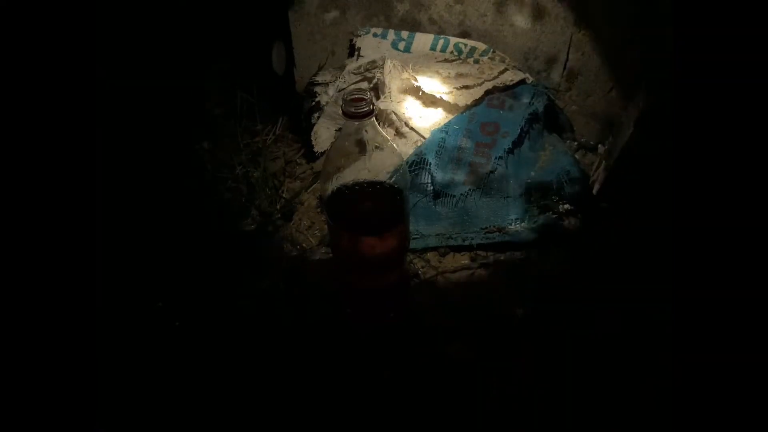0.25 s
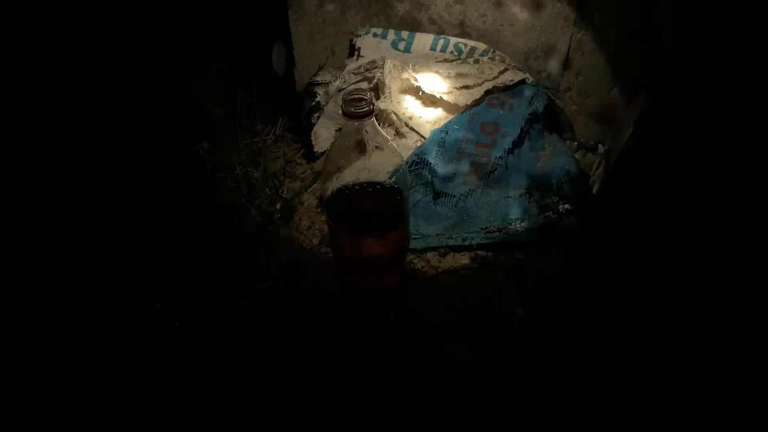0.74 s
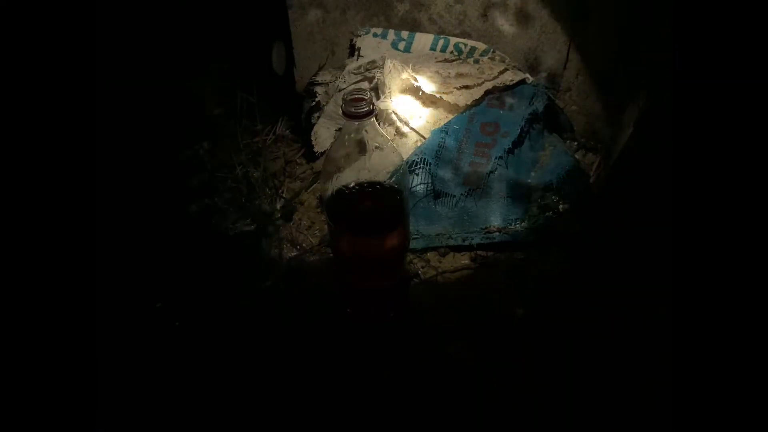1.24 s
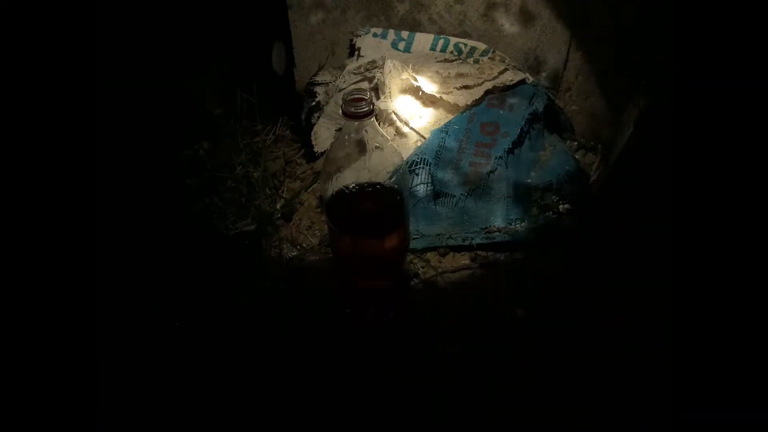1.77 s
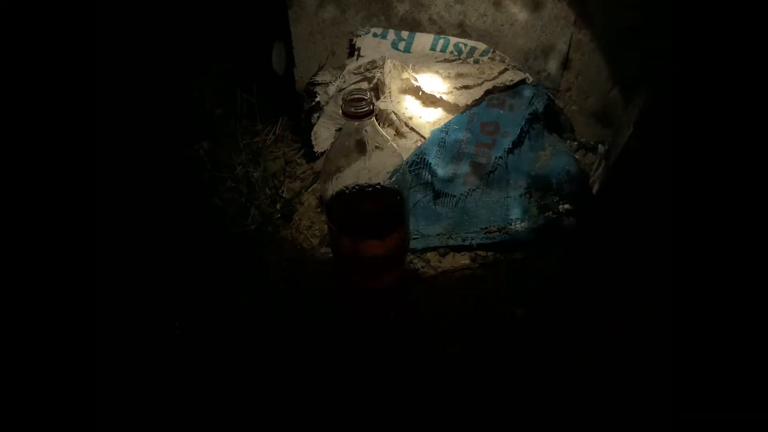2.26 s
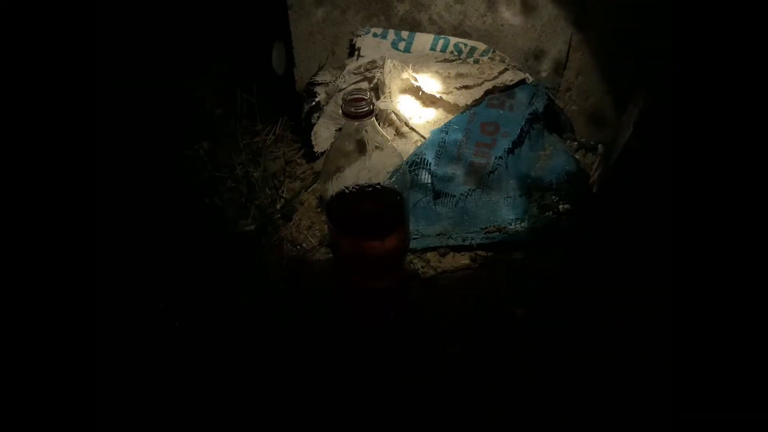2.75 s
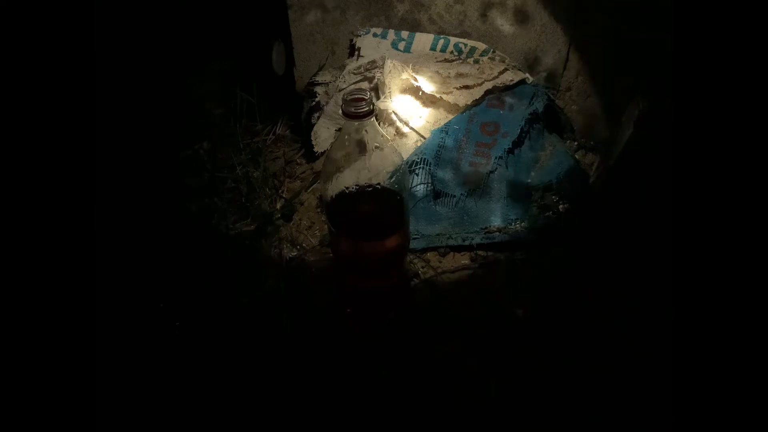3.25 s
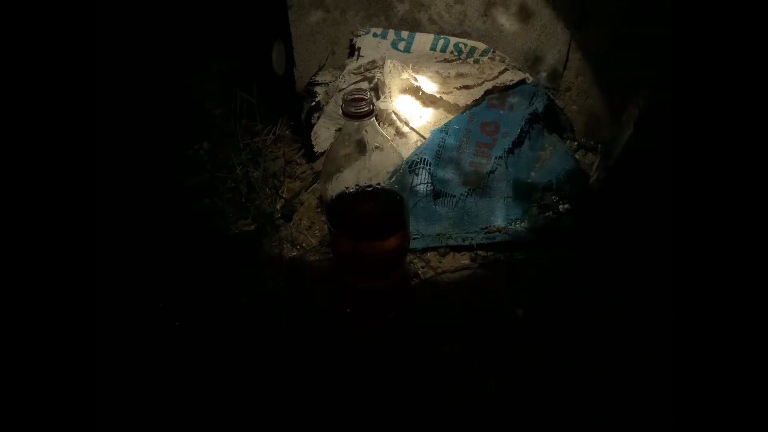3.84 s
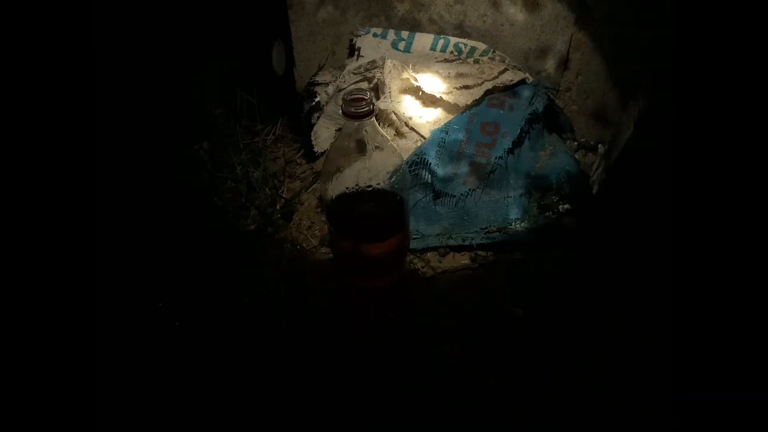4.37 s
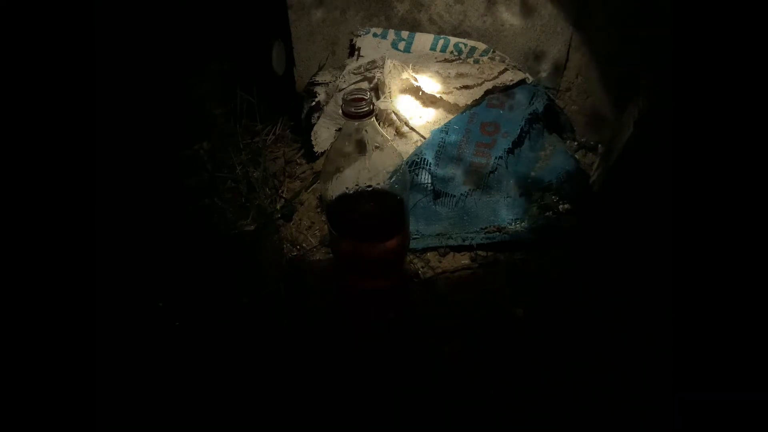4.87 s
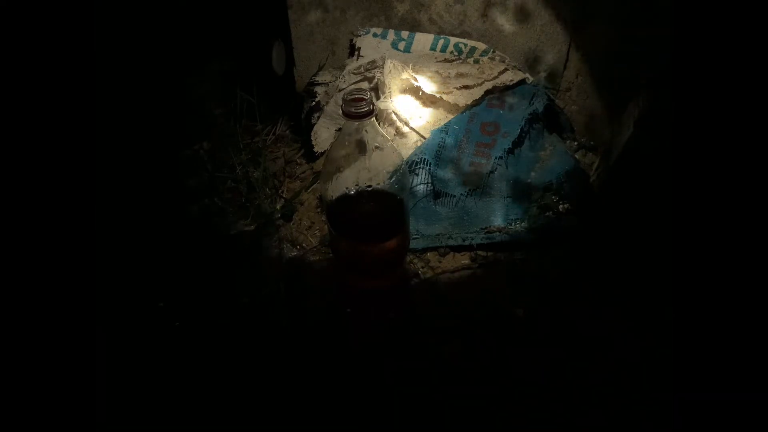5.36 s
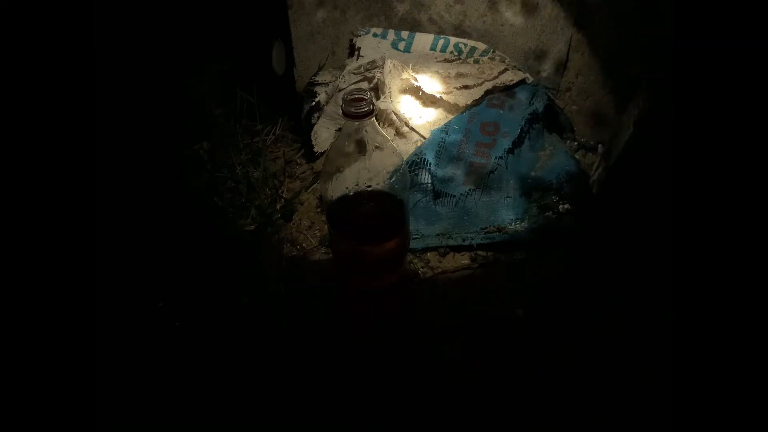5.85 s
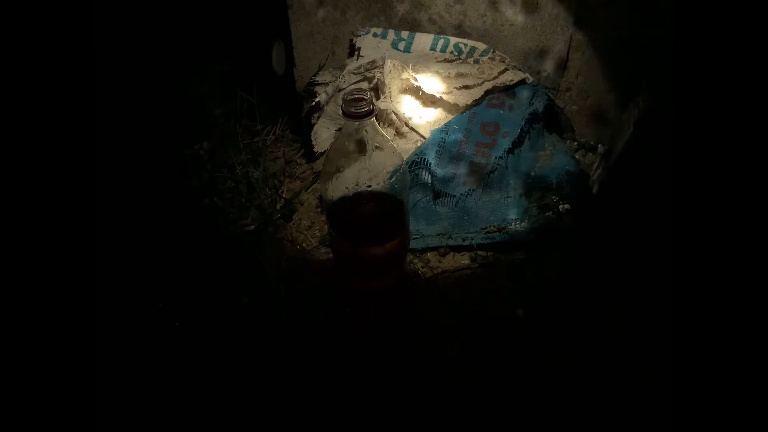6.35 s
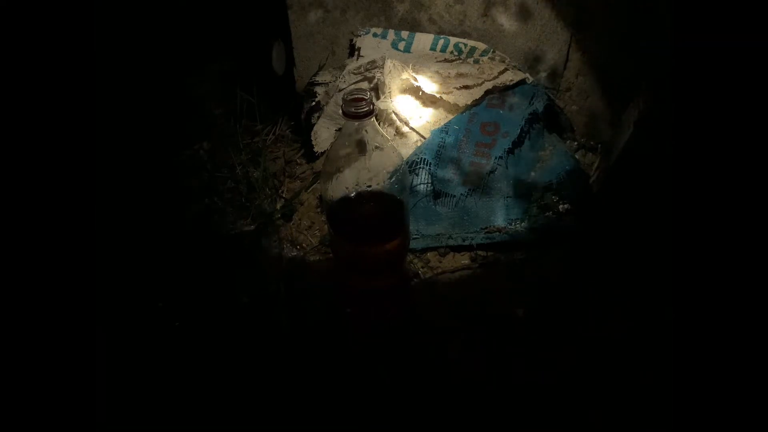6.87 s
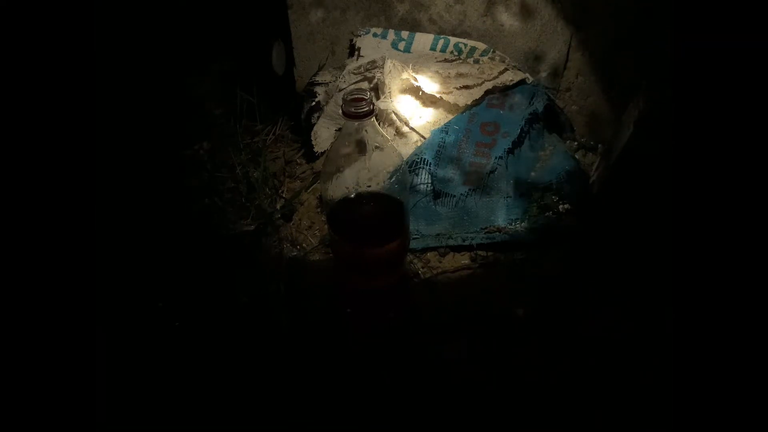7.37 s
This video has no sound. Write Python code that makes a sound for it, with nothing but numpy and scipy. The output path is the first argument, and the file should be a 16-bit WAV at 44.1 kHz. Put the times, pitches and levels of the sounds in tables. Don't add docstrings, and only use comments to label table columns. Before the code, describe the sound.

Close, rapid liquid patter on plastic sheeting outdoors, bright crackly ticks gaining deeper, looser thumps, with very quiet insects and a far engine behind.

```python
import sys
import numpy as np
from scipy import signal
from scipy.io import wavfile
from scipy.ndimage import uniform_filter1d

SR = 44100
rng = np.random.default_rng(int(sys.argv[2]) if len(sys.argv) > 2 else 0)


def to_wav(s):
    ch = np.atleast_2d(s).T
    pcm = np.round(np.clip(ch, -1, 1) * 32767)
    wavfile.write(sys.argv[1], SR, pcm.astype(np.int16))


def volts_from_decibels(level):
    exponent = np.asarray(level, float) / 20
    return 10 ** exponent


N = 335581

# (time [s], deep rumble level [dB], drone level [dB])
ROAD = [
    (0, -57, -61),
    (2.8, -56.5, -63.5),
    (3.2, -57.5, -62.5),
    (4.3, -62, -59.5),
    (5.2, -55.5, -63.5),
    (6.4, -61.5, -63),
    (6.6, -48.5, -59.5),
    (6.85, -59.5, -62.5),
    (7.6, -62, -64.5),
]
# (frequency [Hz], density [dB per Hz])
RUMBLE = [(8.8, -44), (15, -22), (43, 1.5), (59, 7.5), (145, -13), (183, -13), (355, -22), (454, -32.5),
          (600, -24), (780, -74), (1320, -120)]
# (time [s], cycle rate [Hz])
ENGINE = [
    (2.8, 17.2),
    (3.02, 19.2),
    (3.25, 20.8),
    (3.35, 23.6),
    (3.55, 23),
    (3.82, 23.2),
    (4.53, 23.2),
    (4.75, 23.2),
    (5.04, 22.1),
    (5.3, 23),
]
# (multiple of cycle rate [1], level [dB], time [s], half length [s])
ORDERS = [(4, -61, 3.88, 0.41), (5, -64.5, 3.9, 0.5), (6, -61, 3.42, 0.28), (6, -59, 4.48, 0.25),
          (6, -64.5, 5.0, 0.19), (7, -60.5, 3.41, 0.23), (7, -72, 4.0, 0.18), (7, -63.5, 4.78, 0.16),
          (8, -68.5, 3.1, 0.27), (9, -71, 4.33, 0.26), (9, -70, 4.9, .2), (10, -74, 3.1, .3)]
# (frequency [Hz], bandwidth [Hz], level [dB])
INSECTS = [(2416, 91, -71.5), (2700, 73, -76.5), (4624, 390, -69.5), (6640, 500, -72), (8320, 200, -76)]
# (time [s], half length [s], frequency [Hz], level [dB])
CHIRP = (5.789, .013, 4760, -48.5)
# (time [s], half length [s], level [dB], low edge [Hz], high edge [Hz])
SCUFF = (1.046, .012, -49, 600, 5000)
# (frequency [Hz], density [dB per Hz])
SPATTER = [(240, -37), (400, -3), (1080, -5), (2220, -2), (2400, 1.5), (3880, -4.5), (4610, -1.5),
           (6690, 2.5), (14800, -2), (15700, -3), (16500, -22)]
# (frequency [Hz], level [dB])
FACETS = [(5200, -32), (6800, 10.5), (8200, -4), (9800, -13), (11400, 14), (12900, 16), (14500, 4)]
# (frequency [Hz], level [dB], 60 dB decay time [s])
SHEET_MODES = [(624, -0.5, 0.021), (1250, -9.5, 0.022), (1848, -9, 0.027), (2470, -56, 0.06),
               (3060, 2.5, 0.0041)]
# (time [s], force on film [dB], force on sheet [dB], pitch of the spot hit [Hz])
FLOW = [(0, -34, -53, 2280), (1.2, -37.5, -66, 2290), (1.78, -35.5, -48.5, 2080), (1.86, -36, -42, 2210),
        (2.9, -30, -38, 1850), (3.5, -31, -47, 2000), (3.69, -30.5, -40, 3100), (3.9, -28, -55, 2140),
        (4.45, -31, -88, 2076), (4.62, -34, -61, 1284), (5.15, -33, -50, 1310), (5.5, -31, -55, 1300),
        (5.9, -28, -36, 1250), (6.45, -30, -41, 1203), (6.78, -40.5, -50, 1138), (6.9, -31, -44, 1330),
        (7.3, -35, -48, 1320), (7.6, -39, -40, 1250)]
# (time [s], peak level [dB], centre
# [Hz])
DISTINCT_TICKS = [(0.0544, -30, 11000), (0.0654, -25, 13350), (0.1585, -29.5, 10780), (0.212, -31.2, 14000),
                  (0.3835, -32.5, 10360), (0.3934, -33, 5940), (0.4049, -31.5, 10810), (0.4218, -35, 9530),
                  (0.458, -29.8, 11810), (0.5064, -30, 12640), (0.5575, -37, 10080), (0.5986, -36, 12800),
                  (0.6448, -39, 9750), (0.7239, -24.5, 11900), (0.8366, -29.5, 11050), (0.8615, -31, 10960),
                  (0.8745, -30.5, 8240), (0.9603, -33, 11100), (1.0694, -32, 11630), (1.1195, -29, 11100),
                  (1.1547, -34, 13410), (1.2027, -33, 8800), (1.24, -32.2, 11130), (1.2478, -30.2, 11690),
                  (1.2572, -31, 12500), (1.3607, -30, 11700), (1.3697, -28.8, 11720), (1.4136, -29, 11530),
                  (1.4227, -35, 9420), (1.5662, -31, 11140), (1.5846, -39, 10140), (1.6238, -28, 9820),
                  (1.6729, -32, 11900), (1.7009, -33, 13560), (1.7194, -30.9, 14500), (1.7715, -34, 10370),
                  (1.782, -20.5, 12170), (1.8081, -30.1, 9420), (1.8147, -32, 11810), (1.8391, -33, 8540),
                  (1.8638, -24.5, 10200), (1.9029, -34, 10420), (1.9313, -27, 11490), (1.9457, -28, 11870),
                  (1.9685, -38, 8890), (1.9793, -26, 13100), (2.0439, -26, 11300), (2.0799, -33, 14170),
                  (2.121, -34, 12310), (2.149, -35, 14510),
                  (2.2459, -23.5, 14100), (2.316, -24, 14210), (2.341, -25, 11200), (2.3654, -27.1, 13120),
              (2.3769, -30.5, 10500), (2.4608, -29, 11860), (2.498, -31, 11850), (2.5214, -26, 10970),
              (2.5463, -24, 11540), (2.6436, -33, 10970), (2.918, -31, 12350), (2.9249, -28.5, 9510),
              (2.968, -30, 9400), (3.057, -26.5, 10720), (3.0867, -25, 12910), (3.1368, -17.5, 11250),
              (3.146, -25, 10860), (3.156, -30, 12540), (3.1847, -23.5, 11380), (3.2318, -27.9, 10700),
              (3.312, -23.5, 14540), (3.3285, -26, 12680), (3.3746, -19.5, 12060), (3.399, -25.8, 14200),
              (3.4587, -26.5, 11000), (3.523, -27, 11230), (3.53, -26, 12450), (3.5477, -29, 14500),
              (3.5983, -31, 9560), (3.625, -27.2, 13220), (3.6508, -27, 11340), (3.6755, -31, 11320),
              (3.7095, -29, 11660), (3.717, -27.5, 10920), (3.727, -31, 12620), (3.7572, -24.5, 12200),
              (3.77, -28.5, 9420), (3.815, -30.5, 7020), (3.8317, -27.3, 10900), (3.852, -24.7, 6300),
              (3.8636, -22, 11130), (3.88, -21, 11100), (3.8943, -28.3, 6910), (3.9037, -22, 10720),
              (3.9311, -23, 12220), (3.939, -26, 11490), (3.9499, -20, 13500), (3.9757, -30, 7280),
              (3.9819, -31, 9300), (3.9887, -25.3, 12150),
                  (4.0081, -22.5, 11190), (4.0329, -21.5, 13600), (4.041, -30, 10270), (4.083, -23, 10800),
                (4.0914, -22.5, 11100), (4.0979, -28.5, 7180), (4.1079, -27, 11880), (4.171, -24.6, 12610),
                (4.18, -28, 10950), (4.2074, -23, 11600), (4.255, -24, 10130), (4.2602, -24, 8300),
                (4.2688, -19, 12780), (4.2816, -24.5, 12460), (4.3234, -26.5, 11300), (4.3306, -22, 8600),
                (4.3368, -22, 11310), (4.3649, -27, 10740), (4.4102, -24.6, 8140), (4.4363, -32, 14000),
                (4.4544, -27, 10780), (4.4651, -27, 8500), (4.5, -28, 11800), (4.5757, -25.5, 11700),
                (4.6909, -27, 12140), (4.6988, -27, 9600), (4.7186, -30, 11830), (4.7472, -19.5, 11400),
                (4.7998, -25, 12450), (4.8212, -16, 11600), (4.8722, -24, 14300), (4.9078, -25, 11270),
                (4.9368, -29, 13130), (4.968, -25, 12400), (5.191, -21.5, 8100), (5.3678, -26.5, 7240),
                (5.4039, -27.9, 14040), (5.431, -31, 9190), (5.4552, -20.5, 8000), (5.5605, -21.5, 6260),
                (5.5784, -29, 9490), (5.6656, -25.5, 8000), (5.688, -30, 12590), (5.6957, -24.0, 11900),
                (5.7253, -27, 12800), (5.7363, -26, 8400), (5.7648, -31, 11780), (5.8696, -29, 10500),
                  (5.908, -33.5, 6280), (5.9441, -22, 14400), (5.9849, -28.1, 12180), (6.0291, -24, 11600),
               (6.0576, -31, 9990), (6.1163, -23.5, 7700), (6.1426, -26, 13200), (6.1606, -20.5, 12010),
               (6.2127, -20.5, 8300), (6.2241, -27.5, 9100), (6.2623, -28, 8950), (6.2964, -21, 7880),
               (6.31, -24.5, 5840), (6.3677, -29, 6300), (6.3817, -30.2, 7900), (6.3973, -19, 6240),
               (6.4055, -21, 8000), (6.411, -24.5, 13610), (6.4266, -24.2, 9640), (6.4521, -28, 9900),
               (6.4627, -29, 9220), (6.468, -30.2, 5170), (6.4838, -28.3, 10350), (6.5016, -24, 7600),
               (6.5146, -24, 9610), (6.5663, -22.5, 6800), (6.572, -23, 14090), (6.5863, -24, 14360),
               (6.5974, -23, 10050), (6.6054, -28, 8380), (6.6689, -23.5, 14370), (6.6757, -34, 14990),
               (6.6812, -27, 9590), (6.7095, -24, 6700), (6.7978, -28.5, 14000), (6.8509, -28, 8490),
               (6.9133, -33, 11570), (6.9375, -24.8, 7400), (6.9533, -29.7, 11080), (6.9777, -37, 6200),
               (7.0548, -24, 8400), (7.111, -30, 14070), (7.18, -32, 8800), (7.2886, -27, 8900),
               (7.3491, -30, 11000), (7.364, -27, 11880), (7.3882, -25, 8500), (7.423, -30, 7900),
               (7.5108, -17.5, 12240), (7.541, -22.5, 9300),
                  (0.9486, -33, 5270),
    (5.028, -25, 7800),
    (5.072, -26, 11800),
    (7.0348, -35, 4310),
    (7.0478, -27, 6240),
    (7.1304, -31, 7410),
    (7.1437, -31, 6600),
    (7.4579, -33, 8900),
]
# (time [s], peak level [dB], pitch [Hz])
TAUT_PLOPS = [(0.006, -44.5, 2390), (0.0655, -44, 2810), (0.2728, -41, 1900), (0.8566, -35, 3570),
              (1.6, -42, 1910), (1.8095, -39.5, 3600), (1.8741, -41, 1820), (1.9035, -42, 2880),
              (1.946, -39, 2160), (1.9692, -38, 1910), (1.9928, -40.5, 1920), (2.063, -42, 2450),
              (2.1048, -42, 1900), (2.1216, -45, 2600), (2.169, -44.5, 2000), (2.2047, -45, 2720),
              (2.2181, -42, 1840), (2.2374, -42.5, 1910), (2.28, -42, 1850), (2.299, -43, 2260),
              (2.3483, -39, 2830), (2.357, -43, 2000), (2.3656, -43.1, 2350), (2.377, -41, 1950),
              (2.406, -44, 2990), (2.439, -43, 2040), (2.5465, -41, 2480), (2.6137, -40.5, 2020),
              (2.6988, -39.5, 2104), (2.9248, -42.5, 2410), (3.033, -40.7, 1870), (3.0575, -45, 2370),
              (3.0729, -37.5, 2130), (3.102, -43, 2280), (3.125, -41, 3080), (3.164, -38, 2070),
              (3.198, -46, 2980), (3.2075, -42, 3220), (3.2257, -44.5, 2650), (3.2719, -42.5, 2200),
              (3.291, -39.5, 1790), (3.3164, -43.5, 2090), (3.3408, -43, 2520), (3.3906, -42, 1930),
              (3.4215, -41, 3180), (3.549, -43, 1980), (3.5937, -42.6, 2070), (3.6513, -40.5, 3050),
              (3.673, -45, 3080), (3.6844, -46, 3120), (3.717, -45, 3090), (3.7259, -46, 3170),
              (3.7359, -45, 3120), (3.7772, -44.5, 2080), (3.959, -43.5, 2470), (4.098, -44, 3450),
              (4.4901, -40.2, 2340), (4.524, -43.8, 3180)]
# (time [s],
# peak level [dB], pitch [Hz])
LATE_PLOPS = [(4.6337, -39.5, 1770), (4.6476, -34, 1480), (4.6922, -34, 2160), (4.7475, -40, 2720),
               (4.801, -34, 1640), (4.8092, -53, 1730), (4.8388, -35.2, 1360), (4.8465, -52, 1570),
               (4.8559, -48, 2350), (4.9087, -40, 2570), (4.9462, -45.1, 1550), (5.0098, -43.5, 1510),
               (5.0556, -40, 1380), (5.0693, -36.5, 1290), (5.0837, -39.5, 1670), (5.1038, -42, 1530),
               (5.1192, -41, 1750), (5.1487, -37, 1806), (5.1677, -44.8, 2110), (5.179, -44.1, 1230),
               (5.2562, -52, 2056), (5.2698, -45, 1340), (5.287, -33.5, 1610), (5.2956, -47.3, 1490),
               (5.3188, -37.5, 1300), (5.3347, -48, 1060), (5.3542, -46, 1210), (5.4052, -43, 1154),
               (5.432, -40, 1510), (5.5532, -39.5, 1670), (5.5619, -36, 1510), (5.5792, -33.5, 1980),
               (5.5915, -44, 2230), (5.6363, -44.5, 1260), (5.666, -32.5, 2460), (5.692, -39, 2640),
               (5.73, -45.6, 1840), (5.7396, -46, 1160), (5.7715, -47.5, 700), (5.8039, -44, 1240),
               (5.868, -36, 1840), (5.8815, -44.6, 1360), (5.915, -43, 1150), (5.932, -40, 1610),
               (5.956, -45, 1330), (5.9882, -42.3, 1180), (5.999, -38, 1410), (6.037, -50, 1340),
               (6.0785, -39.5, 1300), (6.094, -49, 740), (6.1176, -43.7, 1100), (6.1258, -42, 1190),
               (6.1386, -36.5, 1540), (6.206, -42, 1484), (6.2413, -46.5, 690),
               (6.2999, -36.5, 1910), (6.315, -41, 1070), (6.3266, -46, 850), (6.354, -35, 1600),
              (6.3657, -39.5, 1200), (6.402, -36.5, 2030), (6.4401, -46.5, 1020), (6.5019, -29.5, 1750),
              (6.509, -41.1, 1830), (6.5656, -40.5, 2580), (6.5846, -42.5, 1190), (6.597, -44.8, 2730),
              (6.6122, -39, 2740), (6.625, -37, 2170), (6.6622, -38.6, 1440), (6.69, -38, 1470),
              (6.7251, -43, 960), (6.8373, -35.6, 2044), (6.86, -41.5, 1220), (6.8777, -38.8, 3130),
              (6.899, -37, 1470), (6.9371, -36, 2760), (6.9478, -37.5, 3270), (6.9696, -33.5, 2100),
              (6.9796, -33, 3230), (6.996, -40.5, 1650), (7.0235, -43.6, 1100), (7.0823, -36, 2340),
              (7.0935, -39, 2590), (7.1042, -39, 3400), (7.1314, -46, 1310), (7.1573, -39.6, 1520),
              (7.1707, -39, 2360), (7.1817, -36, 1160), (7.2374, -37.5, 2430), (7.2489, -33, 2070),
              (7.259, -41, 2080), (7.27, -42.5, 1080), (7.2883, -47, 1130), (7.3139, -32.0, 2120),
              (7.3281, -36.5, 2820), (7.3538, -41, 1210), (7.3707, -43, 3140), (7.3891, -41.5, 1180),
              (7.4125, -39.5, 900), (7.431, -40.5, 2320), (7.4678, -41.5, 1146), (7.4867, -40.5, 1260),
              (7.5265, -38, 1600), (7.541, -39, 1920), (7.5533, -40, 1050), (7.5824, -40, 1350)]


def rms_one(x):
    return x / np.sqrt(np.mean(x ** 2) + 1e-20)


def in_time(rows):
    s, *columns = np.transpose(rows)
    return [np.interp(np.arange(N) / SR, s, c) for c in columns]


def drift(rate):
    r = np.exp(-80 * np.pi * rate / SR)
    slow = signal.lfilter([1], [1, -2 * r, r * r], rng.standard_normal(N // 40 + 2002))[2000:]
    return np.interp(np.arange(N) / 40, np.arange(len(slow)), rms_one(slow))


def resonance(x, hz, width):
    r = np.exp(-np.pi * width / SR)
    poles = [1, -2 * r * np.cos(2 * np.pi * hz / SR), r * r]
    return signal.lfilter([(1 - r * r) / 2, 0, (r * r - 1) / 2], poles, x)


def bandpass(x, low_hz, high_hz):
    return signal.sosfilt(signal.butter(2, [low_hz, high_hz], "band", fs=SR, output="sos"), x)


def banded_noise(spectrum, patchy_db, rate):
    hz, db = np.transpose(spectrum)
    octaves = np.log2(min(hz[-1], 18000) / hz[0])
    edges = hz[0] * 2 ** np.arange(0, octaves, 1 / 3)
    white, out = rng.standard_normal((2, N + SR // 2)), 0
    for k, (low, high) in enumerate(zip(edges, edges[1:])):
        band = bandpass(white[k % 2], low, high)[-N:]
        level_db = np.interp(np.log(low * high) / 2, np.log(hz), db)
        out = out + volts_from_decibels(level_db + patchy_db * drift(rate)) * band
    return rms_one(out)


def decay(clicks, seconds):
    return signal.lfilter([1], [1, -np.exp(-1 / (seconds * SR))], clicks)


def add(out, s, sound):
    i = round(s * SR)
    out[i:i + len(sound)] += sound[:N - i]


def road():
    deep_db, drone_db = in_time(ROAD)
    rumble = banded_noise(RUMBLE, patchy_db=0.95, rate=3.3)
    deep = signal.sosfiltfilt(signal.butter(2, 95, fs=SR, output="sos"), rumble)
    return volts_from_decibels(deep_db) * rms_one(deep) + volts_from_decibels(drone_db) * rms_one(rumble - deep)


def engine():
    hz, = in_time(ENGINE)
    t, out = np.arange(N) / SR, 0
    phase = 2 * np.pi * np.cumsum(hz + .15 * drift(6)) / SR
    for order, db, s, half in ORDERS:
        swell = np.exp(-np.abs((t - s) / half) ** 3)
        out = out + volts_from_decibels(db) * swell * np.sqrt(2) * np.sin(round(order) * phase)
    return out


def insects():
    white, t, chorus = rng.standard_normal(N), np.arange(N) / SR, 0
    for hz, width, db in INSECTS:
        band = resonance(resonance(white, hz, width), hz, width)
        chorus = chorus + volts_from_decibels(db + 1.8 * drift(3)) * rms_one(band)
    s, half, hz, db = CHIRP
    swell = np.exp(-((t - s) / half) ** 4) * np.abs(np.sin(np.pi * (t - s) / .02))
    return chorus + volts_from_decibels(db) * swell * np.sin(2 * np.pi * hz * t)


def scuff():
    s, half, db, low_hz, high_hz = SCUFF
    swell = np.exp(-((np.arange(N) / SR - s) / half) ** 2)
    grains = rng.standard_normal(N) * volts_from_decibels(2.3 * drift(150)) * swell
    return volts_from_decibels(db) * bandpass(grains + 1e-18, low_hz, high_hz)


def spatter(film_db):
    level_db = -57.5 + 0.23 * (film_db - film_db.mean())
    return volts_from_decibels(level_db) * banded_noise(SPATTER, patchy_db=3.0, rate=30)


def small_drops(level_db, slack, per_s):
    sizes = volts_from_decibels(7.2 * np.minimum(rng.exponential(1, N), 1.6))
    born = rng.random(N) < per_s * volts_from_decibels(3.0 * drift(12)) / SR
    facet, white, out = rng.integers(0, len(FACETS), N), rng.standard_normal(N), 0
    for k, (hz, db) in enumerate(FACETS):
        drops = sizes * born * (facet == k) + 1e-18
        burst = white * (decay(drops, .0004) + volts_from_decibels(-13) * decay(drops, .003))
        duller_db = -7.0 * slack * np.log2(hz / 9000)
        rung = resonance(burst, hz, 0.058 * hz + 300) + 0.47 * burst
        out = out + volts_from_decibels(db + duller_db) * rung
    bright = signal.sosfilt(signal.butter(4, 4400, "high", fs=SR, output="sos"), out)
    return volts_from_decibels(level_db) * rms_one(bright)


def tick(hz, noise, spray_db, spray_s):
    t = np.arange(len(noise)) / SR - .0005
    crack = np.exp(-np.abs(t) / np.where(t < 0, .00005, 1.92 / hz))
    crack = crack * (np.cos(2 * np.pi * hz * t) + 0.46 * noise)
    grains = noise * np.abs(noise[::-1])
    spray = volts_from_decibels(spray_db) * grains * np.exp(-t / spray_s) * (t > 0)
    low_edge = np.clip(0.64 * hz, 3200, 6500)
    bright = signal.lfilter(*signal.butter(4, low_edge, "high", fs=SR), crack + spray)
    rung = 1.03 * bright + 0.61 * resonance(bright, hz, 0.3 * hz)
    return rung / np.abs(rung).max()


def ticks(rows):
    out, noise = np.zeros(N), rng.standard_normal((len(rows), 900))
    for (s, db, hz), grain in zip(rows, noise):
        add(out, s - .0005, volts_from_decibels(db) * tick(hz, grain, spray_db=-13.5, spray_s=0.0033))
    return out


def thump(hz, slack, chance, noise):
    t = np.arange(len(noise)) / SR
    slack = slack * min(2000 / hz, 1) ** 2
    falling_hz = hz * (1 - 0.9 * slack + 1.716 / (1 + t * hz / (0.76 * slack)))
    cycles = np.cumsum(falling_hz) / SR
    damping = slack ** 0.19 / (0.62 * volts_from_decibels(chance[0]))
    envelope = cycles ** (1.3 - 0.7 * slack) * np.exp(-cycles * damping)
    wave = -np.sin(2 * np.pi * cycles) * envelope
    wave = wave / np.abs(wave).max()
    rattle = noise * (1 - np.exp(-t / .0008)) * np.exp(-t / .006)
    wave = wave + volts_from_decibels(-7.0) * resonance(rattle, hz, .6 * hz)
    for (mode_hz, db, t60), luck in zip(SHEET_MODES, chance[1:]):
        near_db = -9.0 * np.log2(mode_hz / hz) ** 2 + 0.27 * luck
        swing = np.sin(2 * np.pi * mode_hz * (1 + 0.028 * luck) * t) * (1 - np.exp(-t / 0.0018))
        wave = wave + volts_from_decibels(db + near_db - 60 * t / t60) * swing
    return wave


def plops(rows, slack, tick_db):
    out = np.zeros(N)
    noise, chance = rng.standard_normal((len(rows), 1100)), rng.standard_normal((len(rows), 6))
    small = [tick(7600, grain, spray_db=-30, spray_s=0.0035) for grain in noise[:12]]
    for k, ((s, db, hz), grain, luck) in enumerate(zip(rows, noise, chance)):
        add(out, s - 1.1 / hz, volts_from_decibels(db + 1.4) * thump(hz, slack[round(s * SR)], luck, grain))
        add(out, s - 1.4 / hz, volts_from_decibels(db + tick_db) * small[k % 12])
    return out


def stream(big, film_db, sheet_db, sheet_hz, slack):
    gap_s, gap_spread, clear_s = .0145, .3, .008
    luck = rng.standard_normal((round(1.2 * N / SR / gap_s), 5))
    s = np.cumsum(gap_s * np.exp(gap_spread * luck[:, 0]))
    clear = np.abs(s[:, None] - big).min(axis=1) > clear_s
    keep = (s < N / SR - .01) & clear
    s, luck = s[keep], np.clip(luck[keep], -3, 1.6)
    at = (s * SR).astype(int)

    tight_hz, loose_hz = 12800, 8650
    facet_hz = (tight_hz + (loose_hz - tight_hz) * slack[at]) * volts_from_decibels(4 * luck[:, 2])
    tick_db = np.minimum(film_db[at] - 2 + 7 * luck[:, 1], -32)
    film = np.c_[s, tick_db, np.clip(facet_hz, 5500, 15000)]

    sway_db = -3 * drift(11)[at]
    size_db = sway_db - 2.5 * (luck[:, 3] + 0.15 * luck[:, 1])
    thump_db = sheet_db[at] - 3 + np.minimum(size_db, 5)
    thump_db = np.minimum(thump_db, -44 - 5.0 * slack[at])
    sheet = np.c_[s + .001, thump_db, sheet_hz[at] * volts_from_decibels(0.8 * luck[:, 4])]
    return film, sheet


def dribble(film_db, sheet_db, sheet_hz):
    slack = np.clip((1300 / sheet_hz) ** 2.2, .15, 1)
    big_ticks = DISTINCT_TICKS
    big_plops = TAUT_PLOPS + LATE_PLOPS
    big_times = np.array(big_ticks + big_plops)[:, 0]
    film, sheet = stream(big_times, film_db, sheet_db, sheet_hz, slack)
    heavy = plops(big_plops, slack, tick_db=-11) + plops(sheet, slack, tick_db=-30.0)
    sharp = ticks(big_ticks) + ticks(film)
    return heavy + sharp + small_drops(film_db - 20.5, slack, per_s=260)


def scene():
    film_db, sheet_db, sheet_hz = in_time(FLOW)
    background = road() + engine() + insects() + scuff()
    return (background + spatter(film_db) + dribble(film_db, sheet_db, sheet_hz))[None]


def roll_off(x):
    return signal.sosfilt(signal.butter(12, 16970, fs=SR, output="sos"), x)


def below(x, edge_hz):
    return signal.sosfiltfilt(signal.cheby2(14, 35, edge_hz, fs=SR, output="sos"), x)


def record(dry):
    body = below(dry, 16120)
    top = below(dry, 16750) - body
    power = top ** 2
    sudden = uniform_filter1d(power, size=60) > 17 * uniform_filter1d(power, size=3000)
    gate = np.minimum(uniform_filter1d(1. * sudden, size=500) * 40, 1)
    return roll_off(body + volts_from_decibels(-6) * gate * top)


dry = scene()
out = record(dry)
to_wav(out)
```